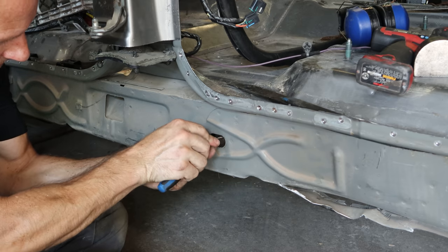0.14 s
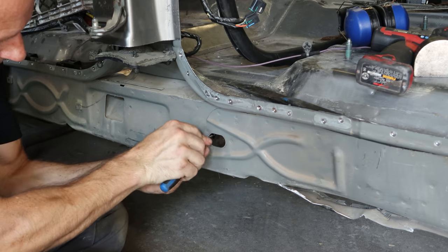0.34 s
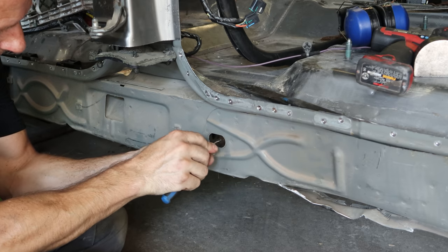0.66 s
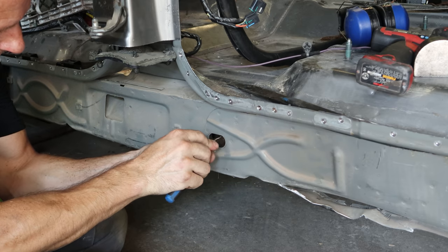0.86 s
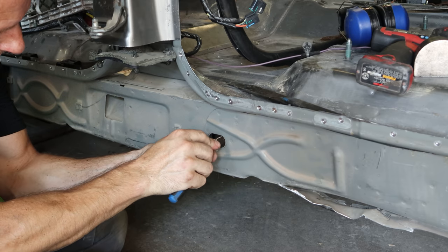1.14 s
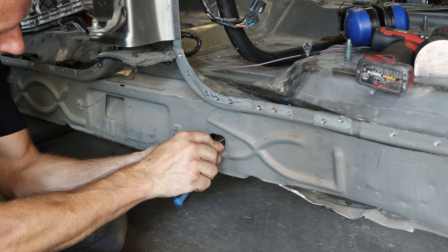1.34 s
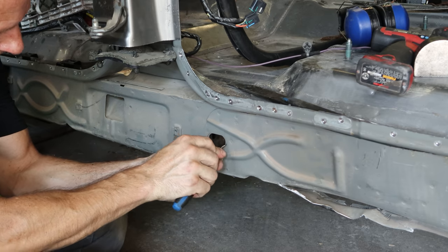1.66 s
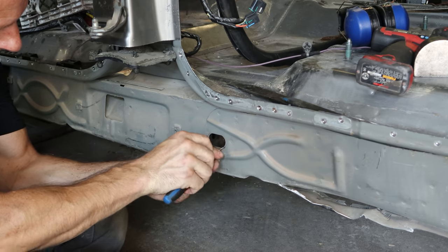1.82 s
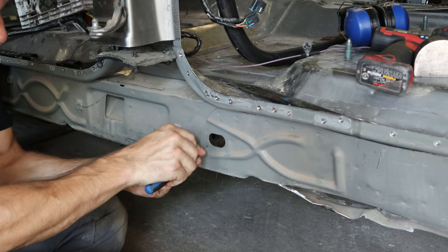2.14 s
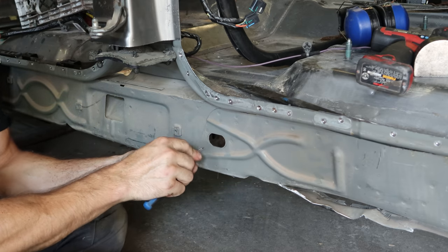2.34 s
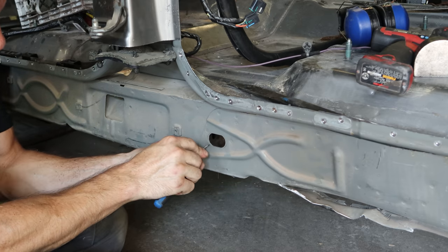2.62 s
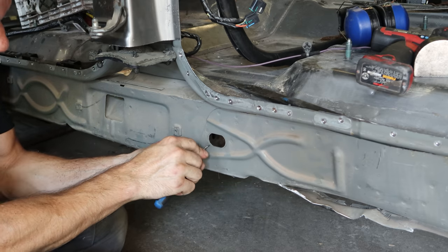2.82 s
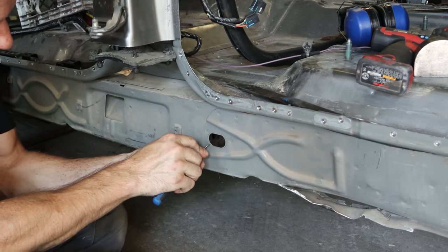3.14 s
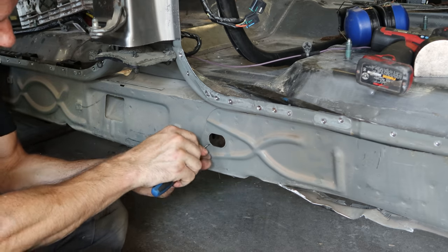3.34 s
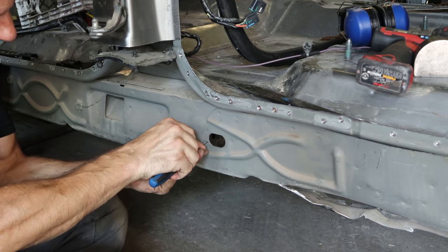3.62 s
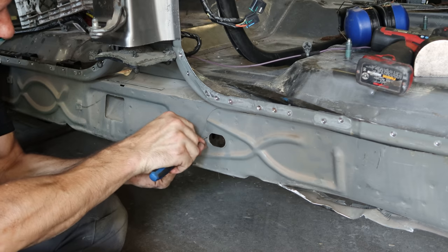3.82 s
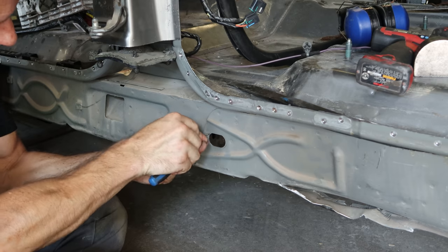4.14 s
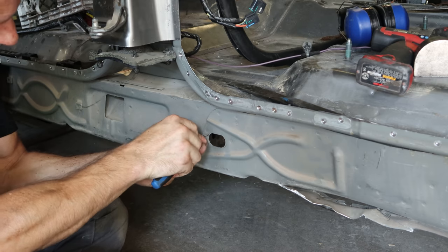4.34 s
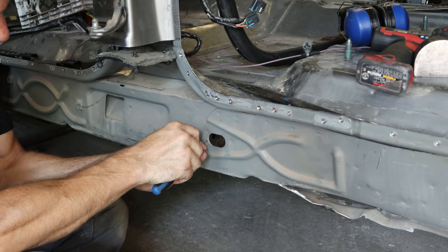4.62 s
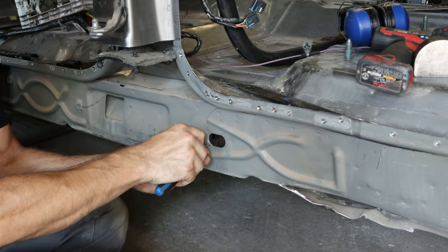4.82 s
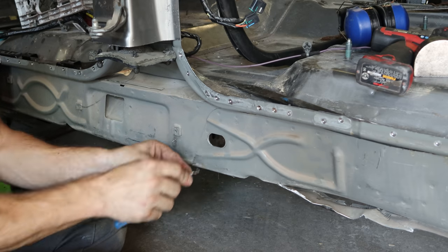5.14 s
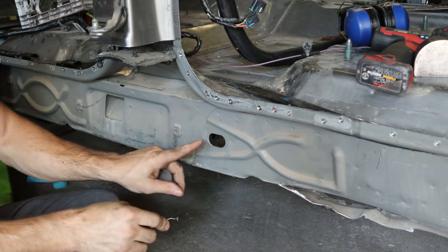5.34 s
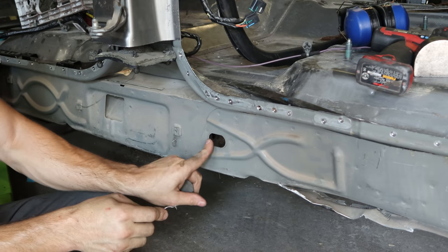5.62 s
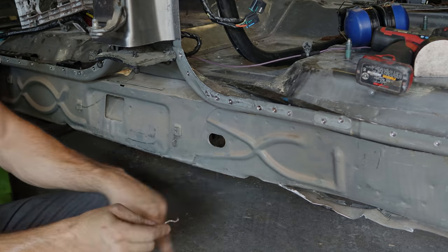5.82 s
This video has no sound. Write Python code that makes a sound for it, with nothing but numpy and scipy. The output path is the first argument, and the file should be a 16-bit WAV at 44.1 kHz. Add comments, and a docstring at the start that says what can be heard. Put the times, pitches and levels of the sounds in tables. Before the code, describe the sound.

Close, dry metal scratching on a thin car sill: stuttering scrapes, hollow knocks with short ring, small taps between, quiet workshop air.

```python
"""Steel scribe on a sheet-metal sill

A hand-held steel scribe is pushed along a pressed sheet-steel sill in a quiet workshop. Its point sticks
and slips in gritty jerks: bursts of random ticks sent through the modes of panel and shank. Soft grit rubs
between the slips, short blows tap the sheet, and low decaying sines boom in the hollow body.
Noise tails return all of this from the body and the shop, over a steady hiss of shaped noise."""
import sys
import numpy as np
from scipy import signal
from scipy.fft import rfft, irfft
from scipy.io import wavfile
from scipy.ndimage import uniform_filter1d

SR = 44100
rng = np.random.default_rng(int(sys.argv[2]) if len(sys.argv) > 2 else 0)


def store_wav(level_fs):
    """Save 16-bit WAV to argv[1]."""
    pcm = np.round(np.clip(np.atleast_2d(level_fs), -1, 1) * 32767)
    wavfile.write(sys.argv[1], SR, pcm.T.astype(np.int16))


N = 263667

SPOTS = 8  # patches of sheet, each with its own crowd of modes


def gain_of(db):
    """Turns dB into an amplitude factor."""
    return 10 ** (np.asarray(db) / 20)


def evened(x):
    """Scales to rms 1."""
    return x / np.sqrt(np.mean(x ** 2) + 1e-20)


def read(points, hz):
    """Reads a curve drawn with straight lines on a log-frequency axis."""
    f, value = np.transpose(points)
    return np.interp(np.log(hz + 1), np.log(f + 1), value)


def dying_noise(t60s, colour, size):
    """Noise that starts at once, each band dying at its own speed; energy 1."""
    noise = rng.standard_normal(size + 512)
    hz, t, z = signal.stft(noise, SR, nperseg=256, noverlap=192)
    t60 = np.maximum(read(t60s, hz), .01)[:, None]
    z = z * gain_of(read(colour, hz)[:, None] - 60 * t / t60)
    tail = signal.istft(z, SR, nperseg=256, noverlap=192)[1]
    tail = tail[128:size + 128]
    return tail / np.linalg.norm(tail)


def steel(size):
    """Answers of sill and scribe to one tick: single modes at either place, then the crowd at each spot."""
    # Single modes. Each row: pitch in Hz, relative level in dB beside the hole, the same on the flat,
    # t60 in seconds.
    mode_rows = [(205, -16, -16, .25), (240, -12, -22, .25), (305, -6, -25, .2), (361, -4, -25, .4),
                 (412, -4, -22, .4), (463, -16, -25, .25), (625, -5, -4, .18), (662, 1, -8, .33),
                 (686, -1, 0, .22), (775, -8, -2, .13), (940, -6, -2, .16), (1038, -9, -2, .16),
                 (1164, -9, -4, .13), (1272, -9, -5, .13), (1455, -3, -2, .14), (1695, -6, -5, .11),
                 (1910, -14, -13, .22), (1990, -8, -8, .1), (2445, -11, -10, .11), (2775, -21, -24, .4),
                 (3190, -14, -16, .09), (4060, -14, -14, .07), (5380, -15, -8, .05), (5660, -17, -11, .03),
                 (6120, -16, -9, .035), (7500, -15, -15, .015), (8250, -18, -13, .015),
                 (9950, -19, -14, .015), (12600, -22, -18, .01), (13900, -22, -14, .012)]
    # Colour of the many crowded modes between them. Each row: frequency in Hz, relative level in dB per Hz.
    crowd_colour = [(60, -66), (150, -73), (300, 7), (500, -2.5), (700, 6), (1400, 2), (2300, -10.5),
                    (3500, -11), (7000, -20), (11000, -24.5), (14500, -30)]
    # Decay of that crowd. Each row: frequency in Hz, t60 in seconds.
    crowd_t60 = [(100, 0.13), (400, 0.18), (1000, 0.05), (3000, 0.055), (8000, 0.033), (15000, 0.0022)]
    crowd_db = 4  # crowd energy against the single modes on the flat

    t = np.arange(size) / SR
    hz, hole_db, flat_db, t60 = np.array(mode_rows).T[:, :, None]
    modes = gain_of(-60 * t / t60) * np.sin(2 * np.pi * hz * t)
    rings = np.array([(gain_of(db) * modes).sum(axis=0) for db in (hole_db, flat_db)])
    crowds = [gain_of(crowd_db) * dying_noise(crowd_t60, crowd_colour, size) for _ in range(SPOTS)]
    metal = np.vstack([rings / np.linalg.norm(rings[1]), crowds])
    # a thin sheet radiates no deep bass
    return signal.sosfilt(signal.butter(4, 185, "highpass", fs=SR, output="sos"), metal)


def place_at(s):
    """Where the point works: 0 beside the hole in the sill, 1 on the flat further along."""
    # Path of the point. Each row: time in seconds, place from 0 to 1.
    path = [(0, 0.014), (2.5, 0.034), (3.5, 0.87), (4.2, 1), (4.5, 0.06), (4.9, 0.06), (5.0, 0.092),
            (5.9, 0.16)]
    return np.interp(s, *np.transpose(path))


def part_levels(s, db, sharp_db, lean_db, hollow_db):
    """Peak dB of middle, upper panel, shank, tip and hollow; the louder half of the panel sets the level."""
    # tip against the panel at sharpness 0, beside the hole and on the flat; a sharper blow brings it out
    tip_db = np.interp(place_at(s), [0, 1], [-5, -2]) + sharp_db
    middle_drop = np.maximum(lean_db, 0)
    upper_drop = np.maximum(-lean_db, 0)
    hollow_follows = 0.34  # share of the middle's drop that the hollow takes along
    return [db - middle_drop, db - upper_drop, db + sharp_db, db + tip_db,
            db + hollow_db - hollow_follows * middle_drop]


def grit(shape):
    """Ticks of paint and scale breaking under the point; a few are larger than the rest."""
    ticks_per_s, spread_db = 5000, 2.5
    draws = rng.random((*shape[:-1], 3, shape[-1]))
    chance, sign, spread = np.moveaxis(draws, -2, 0)
    size = gain_of(-spread_db * np.log(spread + 0.029))
    return (chance < ticks_per_s / SR) * np.sign(sign - .5) * size


def blows(s, levels_db, force, metal):
    """Sends each short force through the metal at its place, part by part."""
    # Hz borders: hollow | middle | upper panel | shank | tip
    low, mid, high, top = 550, 1150, 2600, 7000
    edge_fade = 0.045  # s: the sharp edge of a blow fades sooner than its body
    size = 2 * metal.shape[1]  # room for the whole convolution
    t = np.arange(force.shape[1]) / SR
    body = rfft(force, size)
    edge = rfft(force * np.exp(-t / edge_fade), size)
    parts = [([low, mid], "bandpass", body), ([mid, high], "bandpass", body),
             ([high, top], "bandpass", edge), (top, "highpass", edge), (low, "lowpass", body)]
    place = place_at(s)[:, None]
    spot = np.arange(len(s)) % SPOTS  # the point never lands twice running on one patch
    out = np.zeros(N + size)
    for (hz, kind, drive), db in zip(parts, levels_db):
        band = signal.butter(5, hz, kind, fs=SR, output="sos")
        hole, flat, *crowds = rfft(signal.sosfilt(band, metal), size)
        answer = (1 - place) * hole + place * flat + np.array(crowds)[spot]
        rings = irfft(drive * answer)
        rings *= (gain_of(db) / abs(rings).max(axis=1))[:, None]
        for start, ring in zip(s, rings):
            out[round(start * SR):][:size] += ring
    return out[:N]


def slips(metal):
    """Each slip of the point bites once, then runs on as a burst of grit that dies away."""
    # Each row: start in seconds, peak level of the panel in dB, sharpness of the shank against it in dB,
    # lean of the upper panel over the middle in dB, fade time of the grit in seconds.
    slip_rows = [(0.0, -29.5, -17, -4.5, 0.0075), (0.023, -39, -41, -6, 0.049),
                 (0.135, -39.5, -28, -1.5, 0.017), (0.163, -40, -12, -3, 0.013),
                 (0.207, -44, -18, 0, 0.044), (0.284, -45.5, -6, 9, 0.025), (0.325, -34, -5, -7, 0.022),
                 (0.341, -26, -6.5, 11, 0.03), (0.359, -24, -6, -8, 0.029), (0.386, -19, -0.5, -1.5, 0.018),
                 (0.399, -33.5, -30, -2, 0.017), (0.43, -27, -14, 0, 0.0095), (1.37, -52, 2, -1, 0.028),
                 (1.456, -46.5, -12, 8, 0.035), (1.646, -44.5, -8, 4, 0.0079), (1.67, -53, 0, 9, 0.0061),
                 (1.71, -38, 2.5, 18, 0.015), (1.742, -32.5, -8, 2, 0.0063), (1.813, -46, -28, 15, 0.0061),
                 (1.868, -58, -24, 10, 0.02), (1.901, -35, -6.5, 0, 0.012), (1.953, -35.5, -30, -12, 0.018),
                 (1.977, -33.5, -9, -4, 0.018), (2.006, -41, -6, 0, 0.018), (2.038, -53, -16, -9, 0.022),
                 (2.075, -32.5, -6, 4, 0.028), (2.098, -16.5, -8, -5, 0.015), (2.126, -14.5, -13, 5, 0.011),
                 (2.145, -16.5, -17, -7, 0.0079), (2.216, -30.5, -21, -8, 0.012),
                 (2.263, -36.5, -3.5, 8, 0.015), (3.567, -35.5, -30, -7, 0.046),
                 (3.594, -26, -14.5, -8.5, 0.015), (3.663, -14, -17, 6, 0.0079),
                 (3.695, -18, -12, 3, 0.016), (3.794, -14.5, -9, 7, 0.013), (3.805, -14.5, -26, -3, 0.018),
                 (3.823, -16, -11.5, 2.5, 0.012), (3.841, -17, -8, -0.5, 0.028),
                 (3.933, -17.5, -14.5, 3, 0.023), (3.944, -26.5, -20, 1, 0.027),
                 (3.958, -21, -12, 5, 0.016), (3.974, -21, -7.5, -0.5, 0.033), (3.99, -22, -19, 0, 0.018),
                 (4.0, -23.5, -14, 7, 0.035), (4.014, -15, -10.5, 7, 0.024), (4.026, -19.5, -6, 6, 0.036),
                 (4.037, -17.5, -7, 2, 0.022), (4.05, -18, -9, -4, 0.023), (4.069, -34, 3, 6, 0.054),
                 (4.08, -22.5, 0, 0, 0.017), (4.096, -17.5, -18, 2.5, 0.019), (4.106, -20.5, 0, 2, 0.012),
                 (4.123, -16.5, -8.5, 17, 0.015), (4.156, -31, -14, -3, 0.054),
                 (4.433, -41.5, -8, -4, 0.015), (4.522, -43, -7, -2, 0.029), (4.549, -34, -8, 3, 0.04),
                 (4.584, -33.5, -6, -1.5, 0.022), (4.623, -34.5, -6.5, -4, 0.014),
                 (4.733, -31.5, -9, -0.5, 0.016), (4.778, -35, -10, 1.5, 0.0088),
                 (4.844, -38, -14, -1, 0.018), (4.877, -31, -13, 4.5, 0.006), (4.937, -16, -20, 19, 0.013),
                 (4.98, -16, -9.5, 37, 0.033), (4.992, -16, 0, 4.5, 0.011), (5.004, -24, -22, 4.5, 0.006),
                 (5.781, -45.5, -7, 18, 0.046)]
    rise_s = 0.00084  # time constant of the grit's rise
    bite_db = -7  # first bite against the energy of the grit
    hollow_places_db = -6.5, -17.5  # hollow against the panel: beside the hole, on the flat

    s, db, sharp_db, lean_db, fade = np.array(slip_rows).T
    t = np.arange(4096) / SR
    push = (1 - np.exp(-t / rise_s)) * np.exp(-(t / fade[:, None]) ** 0.93)
    force = grit(push.shape) * push
    force[:, 0] = gain_of(bite_db) * np.linalg.norm(force, axis=1)
    hollow_db = np.interp(place_at(s), [0, 1], hollow_places_db)
    return blows(s, part_levels(s, db, sharp_db, lean_db, hollow_db), force, metal)


def drag(metal):
    """Light unbroken rubbing between slips: soft grit under a hand pressure that trembles."""
    # A list of strokes, each a list of points. Each point: time in seconds, level in dB.
    strokes = [
        [(0.0, -70), (0.33, -58.5)],
        [(1.35, -63.5), (1.55, -65)],
        [(1.63, -65), (1.716, -49), (1.852, -55.5), (2.09, -45)],
        [(4.4, -52.5), (4.606, -60), (4.736, -59), (4.94, -52.5)],
        [(5.7, -68), (5.97, -69.5)],
    ]
    dull_hz, tremble_db = 2410, 4.35  # treble roll-off of the grit, rms depth of the tremble

    t, pressure = np.arange(N) / SR, np.zeros(N)
    for points in strokes:
        s, db = np.transpose(points)
        ramps = np.clip(np.minimum(t - s[0], s[-1] - t) / 0.0056, 0, 1)  # s: fade in and out
        pressure += gain_of(np.interp(t, s, db)) * ramps
    wobble = evened(uniform_filter1d(rng.standard_normal(N), 400))
    trembling = evened(grit((N,)) * gain_of(tremble_db * wobble))
    soft = signal.lfilter(*signal.butter(1, dull_hz, fs=SR), trembling)
    answer = 0.84 * metal[0] + metal[-1]  # the resting hand mutes the single modes
    return signal.fftconvolve(soft / soft.std() * pressure, answer / np.linalg.norm(answer))[:N]


def hiss():
    """Steady air and microphone noise: random spectra under one colour, with faint drifting patches."""
    # Colour of the hiss. Each row: frequency in Hz, relative level in dB per Hz.
    hiss_colour = [(12, -47), (20, -43), (81, -5), (113, -0.5), (145, -5.5), (176, -2.5), (291, -8.5),
                   (537, -9), (671, -7.5), (815, -6), (1380, -9), (2160, -10), (4110, -12), (7380, -4.5),
                   (15700, -13)]
    hiss_db, patch_db = -51.5, 0.17  # rms level of the hiss, rms depth of the patches

    frames, hz = N // 256 + 5, np.fft.rfftfreq(1024, 1 / SR)
    real, imag, patches = rng.standard_normal((frames, 513, 3)).T
    # smooth over neighbouring bins, then over time
    patches = evened(uniform_filter1d(uniform_filter1d(patches, 12, 0), 14, 1))
    z = (real + 1j * imag) * gain_of(read(hiss_colour, hz)[:, None] + patch_db * patches)
    noise = signal.istft(z, nperseg=1024, noverlap=768)[1][:N]
    return gain_of(hiss_db) * evened(noise)


def shop(x):
    """The hollow body and the walls return the sound, as three noise tails that take quick turns."""
    # Decay of the return. Each row: frequency in Hz, t60 in seconds.
    shop_t60 = [(100, 1), (300, 1), (800, 0.83), (2000, 0.9), (5000, 0.55), (12000, 0.45)]
    turn_hz = 39.75  # how fast the three noise tails take turns; blurs narrow tones in the return

    turn, out = 2 * np.pi * turn_hz * np.arange(N) / SR, np.zeros(N)
    for k in range(3):
        tail = dying_noise(shop_t60, [(50, 0), (16000, 0)], SR)
        share = np.sqrt(2 / 3) * np.cos(turn + k * np.pi / 3)  # the three powers always sum to 1
        delayed = np.r_[np.zeros(300), tail]
        out += signal.fftconvolve(x * share, delayed)[:N]
    return out


def booms(metal):
    """The point lets go: two close low modes and a thud swell, beat and die; the sill's low modes bloom."""
    # Each row: start in seconds, peak level of the body's boom in dB, peak level of the sill's hollow ring
    # in dB, top of that ring in Hz.
    boom_rows = [(0.392, -47, -25, 700), (2.099, -45.5, -35, 740), (2.147, -70, -29.5, 740),
                 (3.798, -57, -37, 740), (4.029, -55.5, -31, 740), (5.007, -44.5, -26, 465)]
    # Low modes of the body. Each row: pitch in Hz, relative level in dB, t60 in seconds.
    body_modes = [(92.7, -2, 0.47), (102.8, -2, 0.84)]
    thud = (66, -6.5, 0.18)  # the whole body rocks once: Hz, relative dB, t60 in s

    t, out = np.arange(SR) / SR, np.zeros(N + SR)
    boom = np.zeros(SR)
    for hz, db, t60 in body_modes + [thud]:
        boom += gain_of(db - 60 * t / t60) * np.sin(2 * np.pi * hz * t)
    boom *= 1 - np.exp(-t / 0.0081)
    bloom = metal[0] * (1 - np.exp(-t[:metal.shape[1]] / 0.019))
    for s, boom_db, sill_db, top_hz in boom_rows:
        sill = signal.sosfilt(signal.butter(4, top_hz, fs=SR, output="sos"), bloom)
        start = round(s * SR)
        out[start:][:SR] += gain_of(boom_db) * boom / abs(boom).max()
        out[start:][:len(sill)] += gain_of(sill_db) * sill / abs(sill).max()
    return out[:N]


def taps(metal):
    """One clean blow with a very short rattle after it; the hand on the sheet damps the ring a little."""
    # Light taps on the sill. Each row: start in seconds, peak level of the panel in dB, sharpness of the
    # shank against it in dB, lean of the upper panel over the middle in dB, hollow against the panel in dB.
    tap_rows = [(2.827, -47, -6, 4, -5), (2.993, -48.5, -13, 7, 5), (3.027, -64.5, -2, -6, 20),
                (3.242, -47.5, -33, -18, -5.5), (5.351, -37, 6.5, 6.5, 8.5), (5.419, -46.5, -3, 28, -8),
                (5.53, -43.5, -10, 12, 3.5)]
    contact_s, hand_t60 = 0.002, 2.7  # time constant of the rattle, extra decay from the hand in s

    s, db, sharp_db, lean_db, hollow_db = np.array(tap_rows).T
    t = np.arange(1024) / SR
    force = grit((len(s), len(t))) * np.exp(-t / contact_s)
    force[:, 0] = 1.4 * np.linalg.norm(force, axis=1)
    damped = metal * gain_of(-60 * np.arange(metal.shape[1]) / SR / hand_t60)
    return blows(s, part_levels(s, db, sharp_db, lean_db, hollow_db), force, damped)


def scene():
    """The scribe close by, its return from body and shop, and the hiss."""
    shop_db = -14
    metal = steel(size=16384)
    near = slips(metal) + drag(metal) + booms(metal) + taps(metal)
    return (near + gain_of(shop_db) * shop(near) + hiss())[None]


def record(dry):
    """A steep low-pass limits the band."""
    edge_hz = 15780
    lowpass = signal.firwin(1023, edge_hz, window=("kaiser", 9), fs=SR)
    return signal.oaconvolve(dry, lowpass[None], "same")


dry = scene()
out = record(dry)
store_wav(out)
```